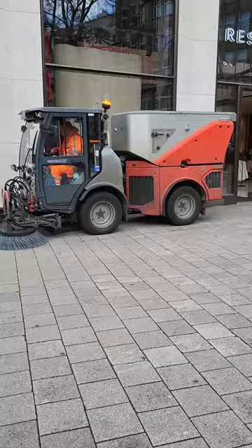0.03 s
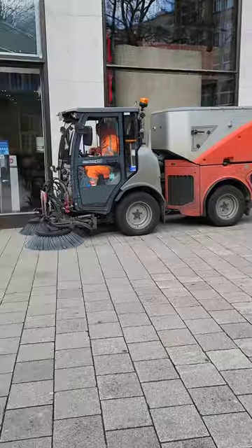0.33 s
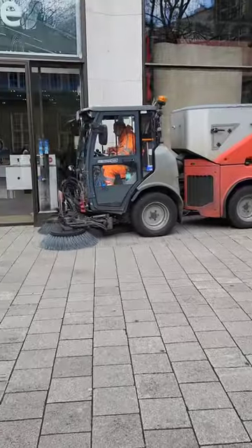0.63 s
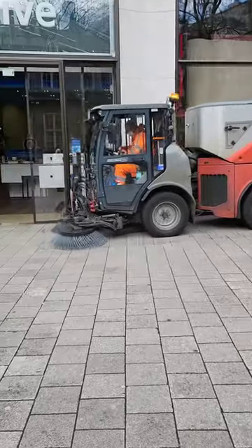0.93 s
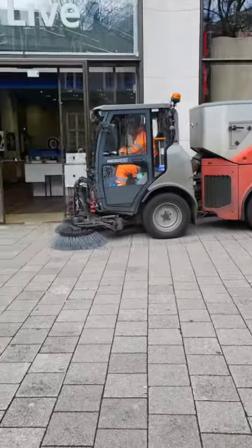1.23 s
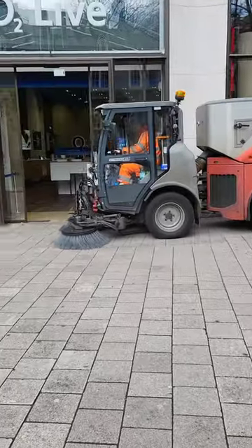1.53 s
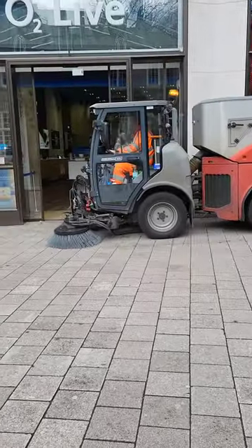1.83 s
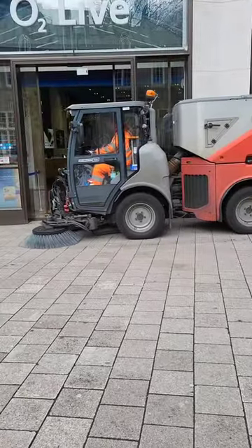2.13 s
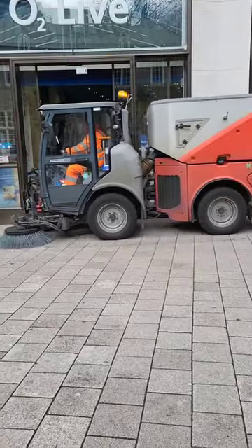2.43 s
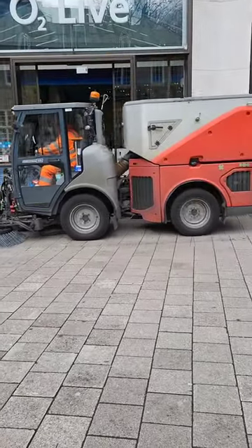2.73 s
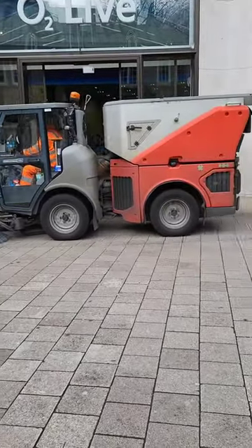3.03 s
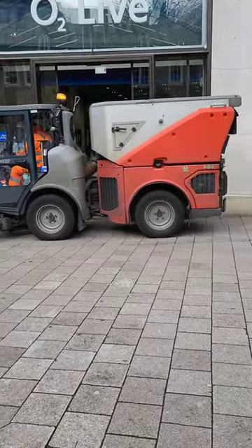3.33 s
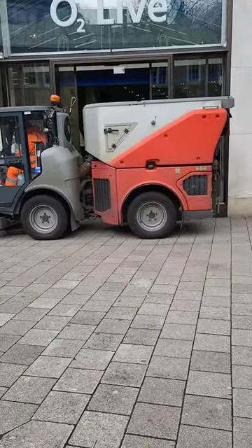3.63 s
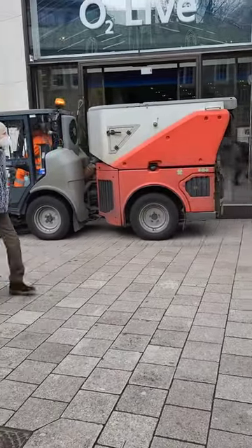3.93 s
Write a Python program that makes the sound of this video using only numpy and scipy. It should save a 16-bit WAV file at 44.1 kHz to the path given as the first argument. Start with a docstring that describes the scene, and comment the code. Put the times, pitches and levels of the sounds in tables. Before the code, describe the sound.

A compact street sweeper creeps past on paving slabs, its engine and suction fan roaring and its brushes hissing. Gusty wind rumbles, flutters and thumps on the microphone throughout, and one short hollow knock comes past the middle.

```python
"""A compact street sweeper creeps past on paving slabs, heard from a two-port microphone in gusty wind.
Its suction fan and engine roar and its brushes hiss, loudest as the suction mouth comes abreast.
Wind hits the microphone: the right port rumbles all the time, the left one flutters and pops,
and the stronger eddies thump on both. One hollow knock stands out."""
import sys
import numpy as np
from scipy import signal
from scipy.fft import rfft, irfft, next_fast_len
from scipy.io import wavfile
from scipy.ndimage import uniform_filter1d, map_coordinates

SR = 44100
rng = np.random.default_rng(int(sys.argv[2]) if len(sys.argv) > 2 else 0)


def dump(signal):
    """Clip the signal to [-1, 1] and save it as 16-bit WAV at the path in sys.argv[1]."""
    limited = np.clip(np.atleast_2d(signal).T, -1, 1)
    pcm = np.round(limited * 32767).astype(np.int16)
    wavfile.write(sys.argv[1], SR, pcm)


N = 176400
TIME_S = np.arange(N) / SR

# swell of the brushes and suction air: time_s, relative_db
SWEEP_LEVEL = [(0.1, -37.5), (0.13, -35), (0.16, -39), (0.29, -34.5), (0.32, -39.5), (0.34, -35),
               (0.44, -38), (0.48, -34), (0.65, -36), (0.7, -35.5), (0.94, -35.5), (1.04, -38.5),
               (1.05, -36), (2.34, -37.5), (2.49, -32), (2.5, -36), (2.59, -33.5), (2.77, -33.5),
               (2.85, -37), (2.88, -33), (2.9, -33.5), (3.04, -32.5), (3.14, -38), (3.44, -39), (3.46, -37),
               (4.0, -42.5)]


def amp(db):
    """Decibels to gain."""
    return 10 ** (np.asarray(db) / 20)


def unit(x):
    """Scale to rms 1."""
    return x / np.sqrt(np.mean(x ** 2) + 1e-20)


def along(points, hz):
    """Read (freq_hz, value) points on a log axis."""
    freqs, values = np.transpose(points)
    return np.interp(np.log(hz + 1), np.log(freqs + 1), values)


def curve(points):
    """Join (time_s, value) points, one value per sample."""
    return np.interp(TIME_S, *np.transpose(points))


def wobble(rate):
    """A smooth random curve, rate knots a second."""
    return map_coordinates(rng.standard_normal(2048), [TIME_S * rate + 2], mode="mirror")


def filtered(x, response):
    """Filter x by a function of frequency."""
    size = next_fast_len(N + SR // 2)
    return irfft(rfft(x, size) * response(np.fft.rfftfreq(size, 1 / SR)), size)[..., :N]


def noise(colour, channels=2):
    """Unrelated coloured noises of rms 1."""
    return unit(filtered(rng.standard_normal((channels, N)), lambda hz: amp(along(colour, hz))))


def narrow(hz, width_hz):
    """A wavering tone: noise in one resonance, rms 1."""
    return unit(filtered(rng.standard_normal(N), lambda f: 1 / (1 + (2 * (f - hz) / width_hz) ** 2)))


def patchy(depth_db):
    """Two noises whose spectra ripple and drift, as reflections shift around a moving source."""
    spectra = signal.stft(rng.standard_normal((2, N)), nperseg=1024)[2]
    ripple = uniform_filter1d(rng.standard_normal(spectra.shape[1:]), size=4, axis=0)
    ripple = unit(uniform_filter1d(ripple, size=22, axis=1))
    return unit(signal.istft(spectra * amp(depth_db * ripple), nperseg=1024)[1][:, :N])


def evened(x, eddy_s=0.022):
    """Flatten the chance swells of a noise that outlast an eddy; rms 1."""
    power = np.abs(uniform_filter1d(x ** 2, int(eddy_s * SR), axis=-1))
    return unit(x / np.sqrt(power + 0.015 * np.mean(x ** 2)))


def placed(pair, colour, likeness, balance):
    """Colour two unrelated signals and spread them over the two ports; rms 1."""
    # phase between the ports: freq_hz, left_lead_rad
    lead = [(100, 0), (2000, -.25), (4400, -.7), (6200, -.1), (7500, 1.1), (8300, .3), (9500, -.4),
            (11400, -.4), (12500, -2.2), (15800, -2.1)]
    turn = lambda hz: np.arccos(np.clip(along(likeness, hz), -1, 1)) / 2
    mid, side = filtered(pair, lambda hz: amp(along(colour, hz)) * [np.cos(turn(hz)), np.sin(turn(hz))])
    half = np.array([[.5], [-.5]])
    ports = lambda hz: amp(half * along(balance, hz)) * np.exp(1j * half * along(lead, hz))
    return unit(filtered(np.array([mid + side, mid - side]), ports))


def spikes(times_s, gains, widths_s, corner_hz):
    """Brief bell-shaped dips of pressure, without their bass."""
    time_s, gain, width_s = np.array([times_s, gains, widths_s])[:, :, None]
    samples = np.round(time_s * SR).astype(int) + np.arange(-128, 128)
    bells = -gain * np.exp(-.5 * ((samples / SR - time_s) / width_s) ** 2)
    train = np.bincount(np.clip(samples, 0, N).ravel(), bells.ravel(), N + 1)[:N]
    return filtered(train, lambda hz: hz ** 4 / (hz ** 4 + corner_hz ** 4))


def vortices(per_s, width_s, scatter_db, corner_hz):
    """A random stream of pressure spikes of rms 1."""
    gap, polarity = rng.random((4000, 2)).T
    strength, size = rng.standard_normal((4000, 2)).T
    times_s = np.cumsum(-np.log(gap)) / per_s
    gains = np.sign(polarity - .5) * amp(scatter_db * np.clip(strength, -2, 2))
    widths_s = width_s * np.exp(0.61 * size)
    heard = times_s < N / SR
    return unit(spikes(times_s[heard], gains[heard], widths_s[heard], corner_hz))


def rumble():
    """Steady wind turbulence on the right port."""
    # strength of the turbulence: time_s, level_db
    level = [(.1, -31.5), (1.2, -30.5), (2.3, -35), (3, -27), (3.4, -31), (4, -43)]
    # its spectrum: freq_hz, relative_db
    colour = [(15, -27), (32, -6), (55, 3), (80, 0), (130, -2), (250, -18.5), (500, -30), (1200, -24.5),
              (4000, -63)]
    return amp(curve(level) + 0.55 * wobble(rate=13)) * noise(colour, channels=1)[0]


def flutter():
    """Small vortices patter on the left port in clumps."""
    # strength of the patter: time_s, level_db
    level = [(.1, -45), (.3, -39), (.37, -35), (.5, -42), (.68, -41), (.95, -32.5), (1.05, -35),
             (1.27, -33), (1.35, -39), (1.6, -33), (1.8, -35.5), (2.2, -37), (2.4, -34), (2.6, -34.5),
             (2.8, -39), (3.2, -37), (3.3, -29.5), (3.42, -39), (3.65, -35), (3.85, -32), (4, -32)]
    patter = vortices(per_s=300, width_s=.0002, scatter_db=3.6, corner_hz=340)
    clumps = amp(2.8 * wobble(rate=38))
    return amp(curve(level)) * unit(patter * clumps)


def pops():
    """Single strong vortices strike one port or both."""
    # vortex strikes: time_s, relative_db, width_s, right_share
    strikes = [(0.267, -8.5, 0.00012, 0.04), (0.475, -10, 0.000076, 0), (.547, -7, 0.00034, 0.6),
               (.590, -10.5, 0.000078, 0), (1.0089, -6.5, 0.000064, 0.1), (1.0875, -5, 0.00011, 0),
               (1.160, -7.5, 0.000096, 0), (1.275, -10, .0002, .3), (1.578, -13, 0.000096, 0),
               (1.841, -14, 0.00052, .4), (1.857, 1, 0.0011, 0.3), (2.125, -11.5, 0.00011, 0),
               (2.279, -11, .00014, 0.1), (2.802, -9, 0.00013, 0.2), (3.066, -2, 0.00029, .4),
               (3.118, -10, 0.00026, 0), (3.13, -2.5, 0.00063, 0.4), (3.184, -13, 0.00025, 0.6),
               (3.324, -12, 0.000067, 0), (3.732, -6, 0.000067, 0.1), (3.830, -11, 0.00014, 0.15),
               (3.911, -7.5, 0.000062, 0)]
    time_s, db, width_s, right = np.transpose(strikes)
    return np.array([spikes(time_s, amp(db) * share, width_s, corner_hz=208)
                     for share in (1 - right, right)])


def gusts():
    """Each eddy swells and drops away: a low thump and a crackling blast, different on each port."""
    # eddies on the microphone: centre_s, length_s, left_thump_db, right_thump_db, blast_db (on both ports, the
    # left 1 dB louder)
    eddies = [(0.135, 0.05, -36, -25, -32.5), (0.375, 0.02, -46, -32, -32), (0.462, 0.055, -32, -27, -29),
              (0.475, 0.015, -36, -32, -28), (0.556, 0.04, -30, -30, -27), (0.76, 0.03, -34, -31, -30),
              (0.833, 0.05, -28, -30, -32), (0.93, 0.06, -40, -36, -34), (1.097, 0.025, -42, -28, -30),
              (1.146, 0.04, -31, -22, -28), (1.2, 0.22, -40, -31, -34), (1.24, 0.05, -33, -22, -29.5),
              (1.41, 0.04, -32, -35, -41), (1.459, 0.025, -30, -32, -34), (1.525, 0.025, -33, -30, -29),
              (1.597, 0.035, -29, -28, -31), (1.82, 0.055, -25, -28, -29), (1.862, 0.05, -28, -28, -28),
              (1.91, 0.03, -30, -28, -34), (1.987, 0.03, -25, -26, -33), (2.086, 0.03, -32, -31, -42),
              (2.21, 0.02, -34, -35, -36), (2.268, 0.045, -37, -34, -32), (2.46, 0.05, -30, -31, -30.5),
              (2.53, 0.025, -38, -29, -30.5), (2.635, 0.06, -31, -29, -29.5), (2.69, 0.02, -26, -28, -36),
              (2.729, 0.02, -24, -25, -27), (2.87, 0.06, -27, -32, -35), (3.02, 0.05, -32, -28, -32),
              (3.072, 0.035, -28, -26, -27), (3.125, 0.04, -32, -24, -25), (3.12, 0.24, -42, -27.5, -33.5),
              (3.187, 0.015, -31, -26, -28), (3.24, 0.035, -30, -25, -33), (3.459, 0.025, -34, -29, -33),
              (3.54, 0.03, -35, -32, -34), (3.624, 0.025, -42, -26, -36), (3.72, 0.04, -44, -26, -38),
              (3.9, 0.04, -42, -26, -38), (3.96, 0.06, -40, -24, -40)]
    # thump spectrum: freq_hz, relative_db
    thump_colour = [(15, -23), (35, -1.5), (58, 0.5), (85, -1.5), (125, 1.5), (200, -10), (400, -23),
                    (1500, -65)]
    # blast spectrum: freq_hz, relative_db
    blast_colour = [(60, -19), (200, -5.5), (380, -1.5), (650, -6), (1100, -20.5), (2200, -36), (5000, -47),
                    (12000, -65)]
    swell = lambda centre_s, length_s: 1 / (1 + ((TIME_S - centre_s) / (0.45 * length_s)) ** 8)
    power = sum(amp(dbs)[:, None] ** 2 * swell(centre_s, length_s) for centre_s, length_s, *dbs in eddies)
    left, right, blast = np.sqrt(power)
    thumps = np.array([left, right]) * evened(noise(thump_colour))
    puffs = np.array([vortices(per_s=420, width_s=0.00038, scatter_db=3.5, corner_hz=193)
                      for port in range(2)])
    rough_air = noise(blast_colour) * amp([3.2 * wobble(rate=200) for port in range(2)])
    crackle = evened(rough_air + amp(1) * puffs)
    return thumps + amp([[1], [0]]) * blast * crackle


def buffets(half_width_cycles=.8):
    """A large eddy shoves each port once, out of step with the other."""
    # low thuds: centre_s, pitch_hz, left_envelope_db, right_envelope_db
    thuds = [(.124, 120, -22, -14), (.468, 75, -21, -19), (.549, 115, -19, -18), (1.104, 105, -30, -11),
             (1.143, 65, -14, -12.5), (1.233, 62, -18, -13.5), (1.856, 120, -17, -16),
             (3.005, 72, -21, -14.5), (3.051, 78, -15, -22), (3.113, 122, -16, -13), (3.134, 140, -20, -15),
             (3.893, 58, -32, -15)]
    ports = np.zeros((2, N))
    for centre_s, hz, left_db, right_db in thuds:
        cycles = (TIME_S - centre_s) * hz
        envelope = amp([[left_db], [right_db]]) * np.exp(-(cycles / half_width_cycles) ** 2)
        ports += envelope * np.cos(2 * np.pi * (cycles + rng.random((2, 1))))
    return ports


def knock(start_s=2.7015, rise_s=.004):
    """A short hollow knock without bass, a little different on each port."""
    # damped resonances: pitch_hz, level_db, t60_s
    modes = [(355, -7, .05), (455, -9, .045), (560, -9, .04), (680, -13, .03), (980, -18, .04)]
    age_s = np.maximum(TIME_S - start_s, 0)
    ring = np.zeros((2, N))
    for hz, db, t60_s in modes:
        phase = .5 * rng.standard_normal((2, 1))
        ring += amp(db - 60 * age_s / t60_s) * np.sin(2 * np.pi * hz * age_s + phase)
    return (1 - np.exp(-(age_s / rise_s) ** 2)) * ring


def dips():
    """A gain that sags briefly now and then."""
    # dips in level: centre_s, half_width_s, depth_db
    sags = [(0.207, .04, 0.5), (0.613, 0.0095, 7), (2.162, 0.022, 4.5), (2.413, 0.01, 12),
            (2.761, 0.0075, 5), (3.406, 0.0051, 9)]
    return amp(-sum(db * np.exp(-((TIME_S - centre_s) / width_s) ** 2) for centre_s, width_s, db in sags))


def engine():
    """The engine's rough low drone and the drive's hum, mostly on the right port."""
    # drone, growing as the rear comes abreast: time_s, right_level_db
    drone_level = [(.1, -41), (2.5, -41), (3.4, -37), (4, -34)]
    # drive hum: time_s, right_level_db
    hum_level = [(.1, -45), (3.3, -43), (3.7, -54)]
    drone = amp(curve(drone_level)) * narrow(hz=67, width_hz=48)
    hum = amp(curve(hum_level)) * narrow(hz=238, width_hz=18)
    return amp([[-20], [0]]) * (drone + hum)


def fan():
    """The suction fan's broad roar, flickering mostly on the left; its whines follow the sweep's swell."""
    # strength of the fan and engine roar: time_s, level_db
    level = [(.1, -34.5), (1.2, -33.5), (2.2, -34.5), (2.7, -30), (3.3, -34), (4, -33)]
    # roar spectrum: freq_hz, relative_db
    colour = [(40, -19), (110, -9.5), (240, 0), (360, 1.5), (520, 0), (760, -3), (960, -5), (1150, -7.5),
              (1580, -7), (1800, -8.5), (2900, -13), (5000, -23), (12000, -41)]
    # likeness of the ports: freq_hz, correlation
    likeness = [(200, 0.2), (700, 0.38), (2500, 0.52)]
    # stereo balance: freq_hz, left_minus_right_db
    balance = [(100, -8.5), (230, -10.5), (350, 1.5), (600, 1), (1200, -0.5), (2500, -2)]
    # faint whines of the fan and hydraulics: pitch_hz, width_hz, level_db
    tones = [(362, 22, -49), (1606, 18, -55), (2907, 85, -56), (5195, 90, -56), (7516, 40, -56.5)]
    # depth of the flicker: left_db, right_db
    flicker_depths = [2.5, .9]
    roar = placed(patchy(depth_db=2.1), colour, likeness, balance)
    whines = sum(amp(db) * narrow(hz, width_hz) for hz, width_hz, db in tones)
    flicker_db = np.array([depth * wobble(rate=40) for depth in flicker_depths])
    roar_db = curve(level) + 1.14 * wobble(rate=14) + flicker_db
    sweep_db = curve(SWEEP_LEVEL)
    return amp(roar_db) * roar + amp(0.86 * (sweep_db - sweep_db.mean())) * whines


def scrape(bristles_per_s=2500, scatter_db=6):
    """Rushing air with the ticks of single bristles."""
    ticks = (rng.random((2, N)) < bristles_per_s / SR) * rng.choice([-1, 1], (2, N))
    strengths = amp(scatter_db * rng.standard_normal((2, N)))
    return patchy(depth_db=2.2) + amp(-5.5) * unit(ticks * strengths)


def brushes():
    """Hiss and top sizzle on the slabs, swelling unevenly as the brushes turn."""
    # hiss spectrum: freq_hz, relative_db
    hiss_colour = [(200, -43), (900, -11), (2300, -3.5), (3400, 1), (4500, 1.5), (5200, 2), (5650, 1.5),
                   (6300, 2.5), (7500, 2), (8100, 0), (8800, -6), (11000, -14), (13000, -36),
                   (15800, -18.5)]
    # stereo balance of the hiss: freq_hz, left_minus_right_db
    hiss_balance = [(2000, 1), (4200, -2.5), (6400, -6), (7800, 0), (9800, 1), (11700, -3), (13000, 2),
                    (15500, -16)]
    # likeness of the ports: freq_hz, correlation
    likeness = [(2000, .55), (4500, .62), (8000, .55), (10500, .3), (15000, .35)]
    # bristle sizzle, fading once the brushes have passed: time_s, relative_db
    sizzle_level = [(0.1, -42), (0.12, -39.5), (0.34, -38.5), (0.44, -45.5), (0.5, -39.5), (1.73, -40),
                    (2.11, -37.5), (2.15, -41.5), (2.67, -37), (2.81, -39.5), (2.99, -36.5), (3.34, -44.5),
                    (3.48, -41), (4.0, -48)]
    # sizzle spectrum: freq_hz, relative_db
    sizzle_colour = [(7000, -40), (10000, -10), (11500, -6), (12600, -2.2), (14400, -.8), (15800, 0)]
    # stereo balance of the sizzle: freq_hz, left_minus_right_db
    sizzle_balance = [(11700, 0), (13000, -2.5), (15500, -4)]
    hiss = amp(curve(SWEEP_LEVEL) + 2.3) * placed(scrape(), hiss_colour, likeness, hiss_balance)
    sizzle = amp(curve(sizzle_level) + 4.5) * placed(scrape(), sizzle_colour, likeness, sizzle_balance)
    swell = amp(1.05 * wobble(rate=36))
    return swell * (hiss + amp(0.8 * wobble(rate=20)) * sizzle)


def scene():
    """The passing sweeper and the wind on each port; fan, flutter and rumble dip together."""
    mix = brushes() + engine() + gusts() + buffets() + knock() + pops()
    return mix + dips() * (fan() + np.array([flutter(), rumble()]))


def record(dry):
    """The sound starts after a moment of silence and has nothing above the band limit."""
    start_s, top_hz = .078, 15770
    return filtered(dry * (TIME_S > start_s), lambda hz: hz < top_hz)


dry = scene()
out = record(dry)
dump(out)
```